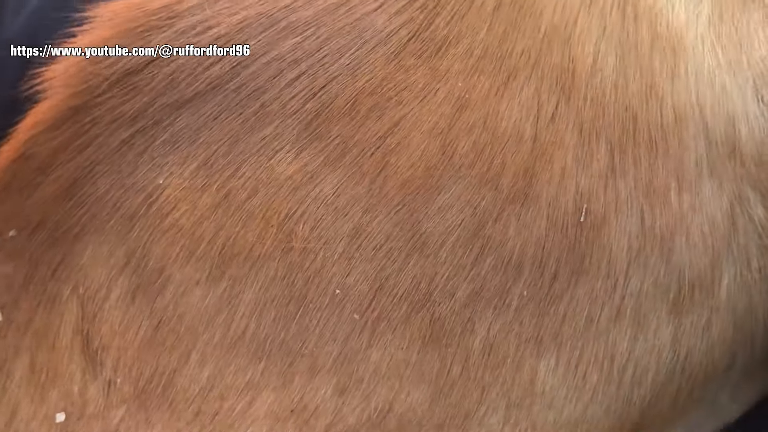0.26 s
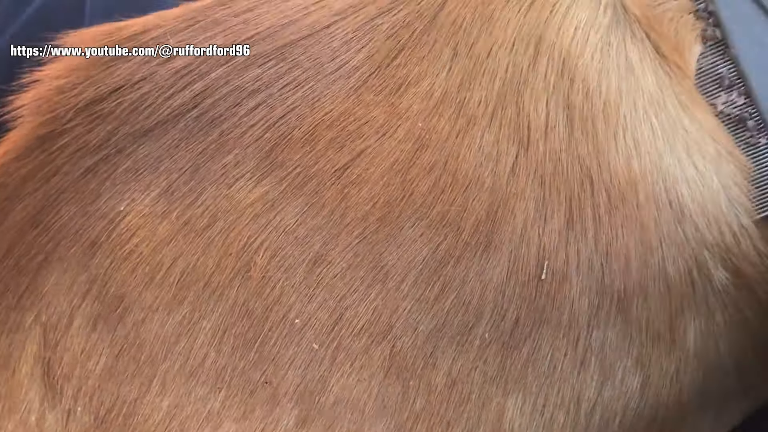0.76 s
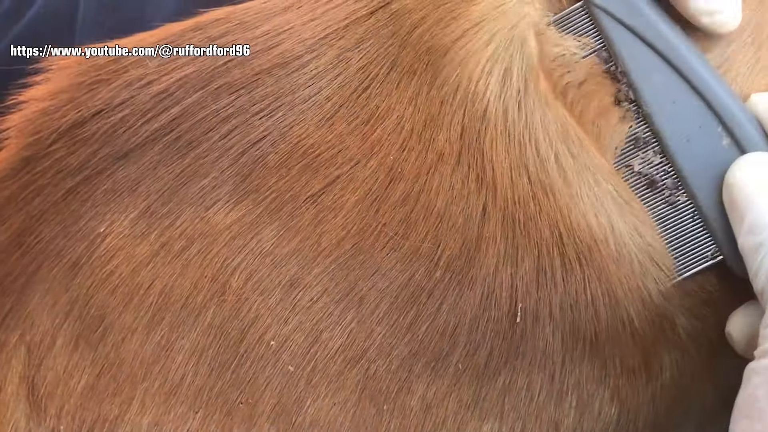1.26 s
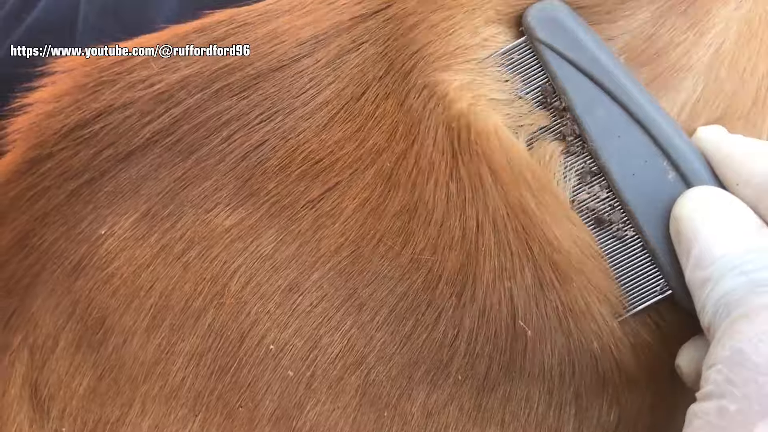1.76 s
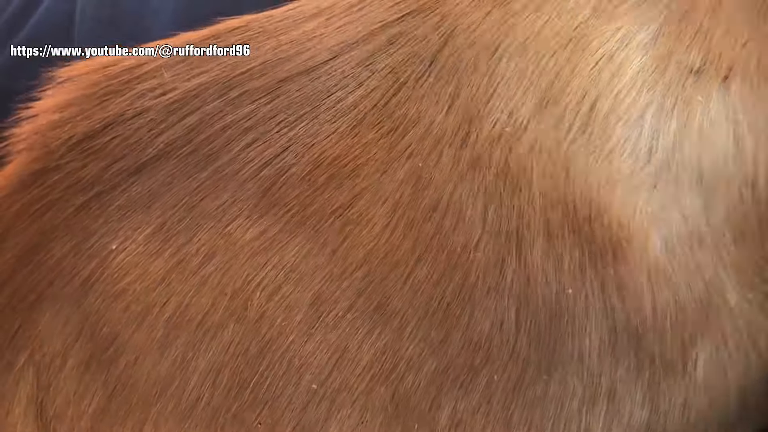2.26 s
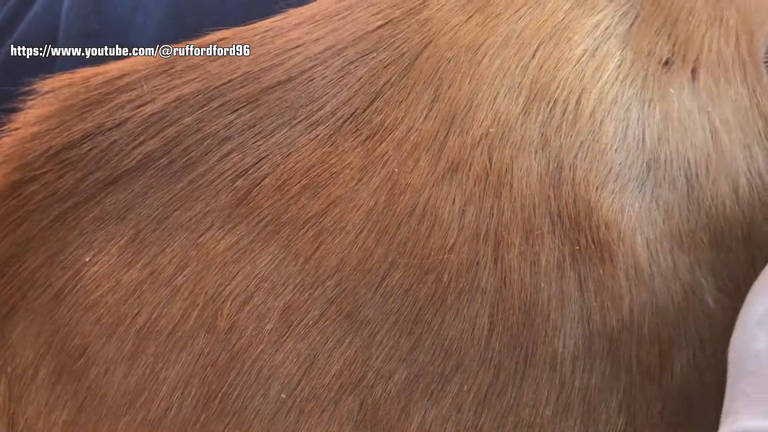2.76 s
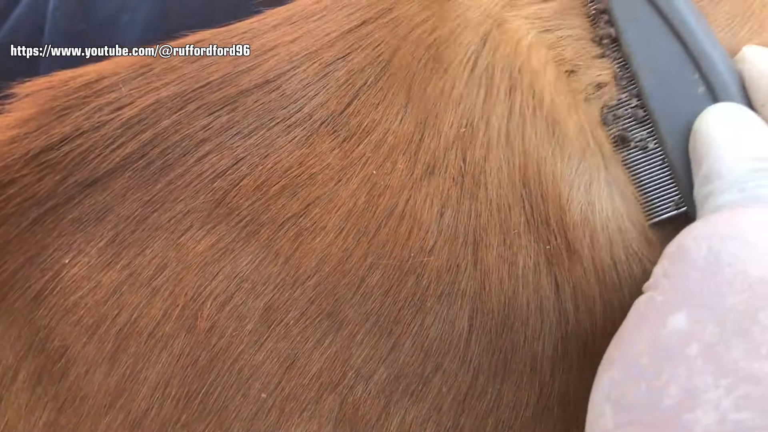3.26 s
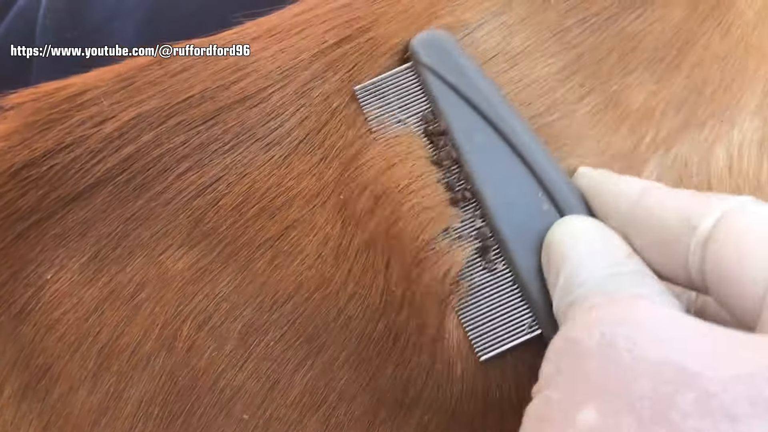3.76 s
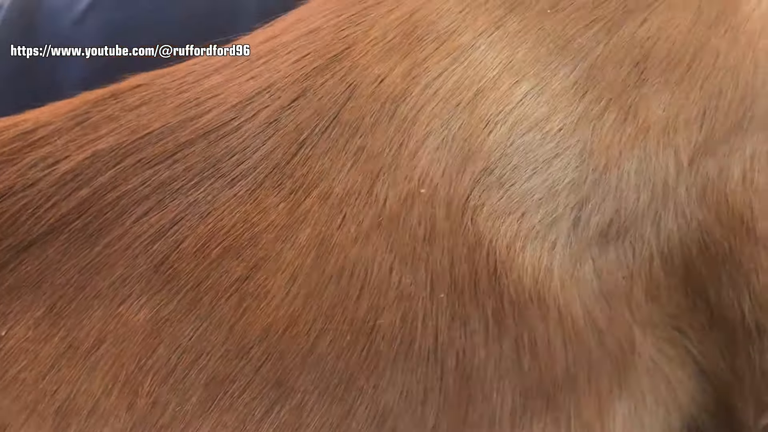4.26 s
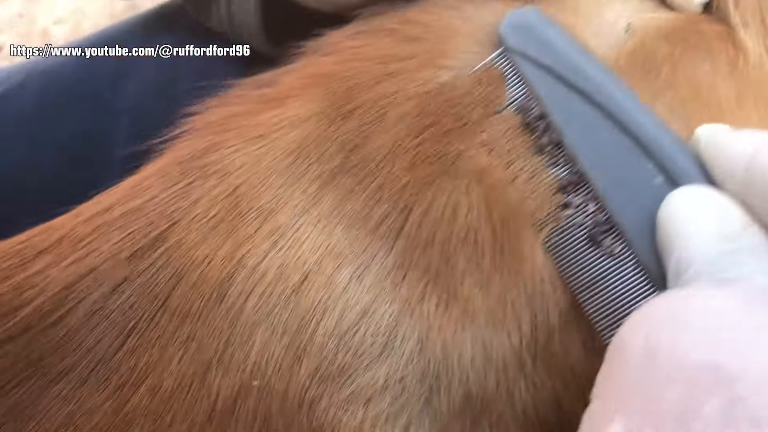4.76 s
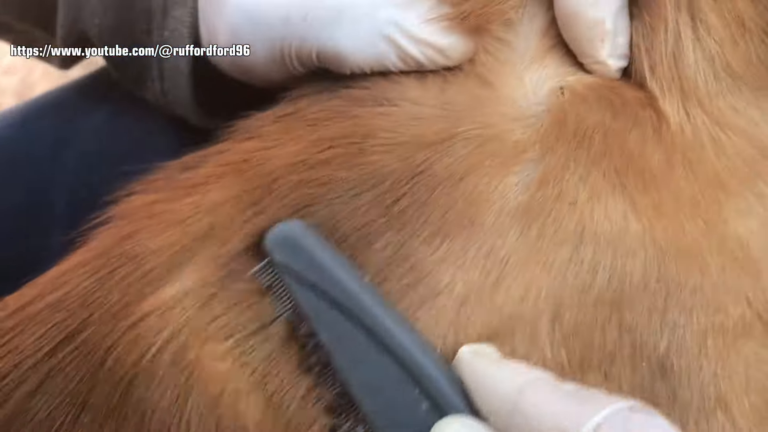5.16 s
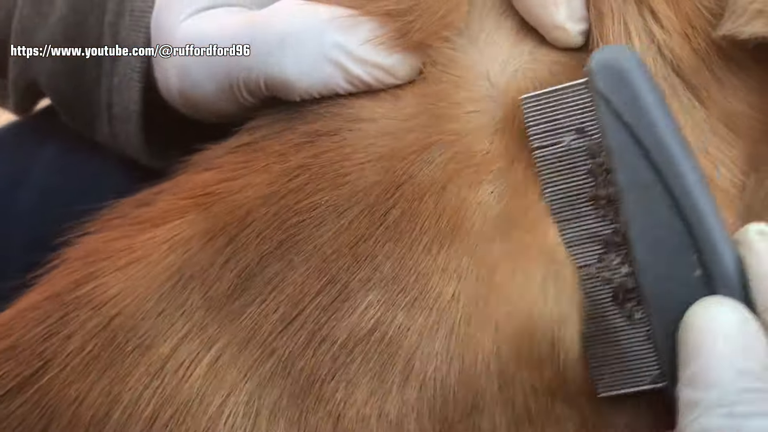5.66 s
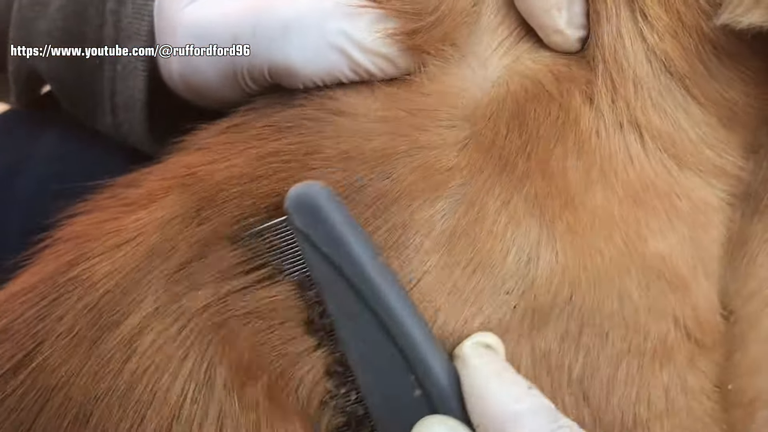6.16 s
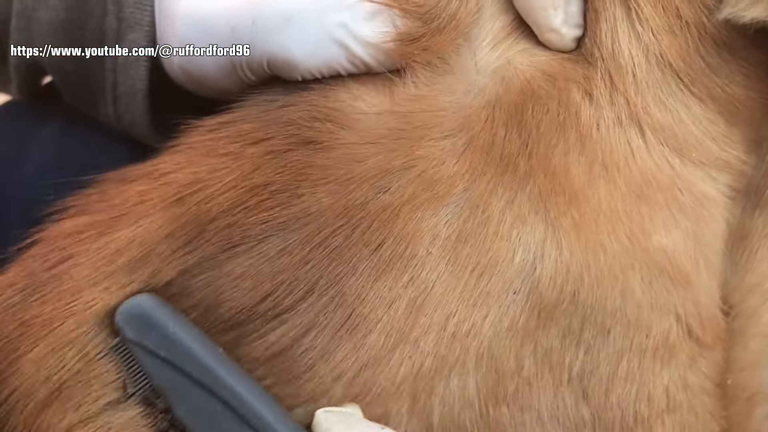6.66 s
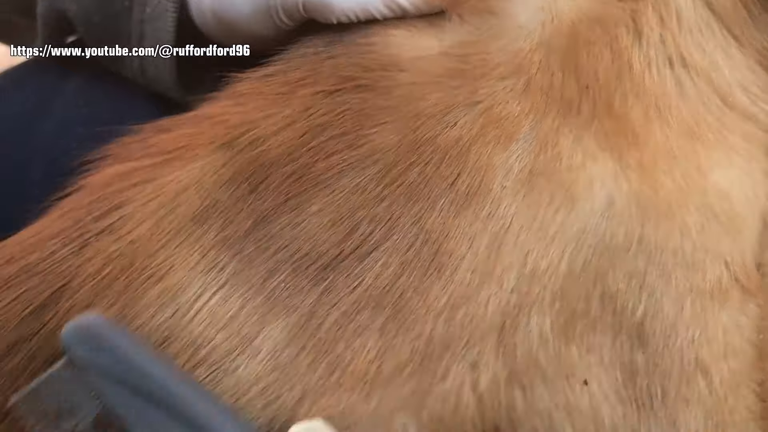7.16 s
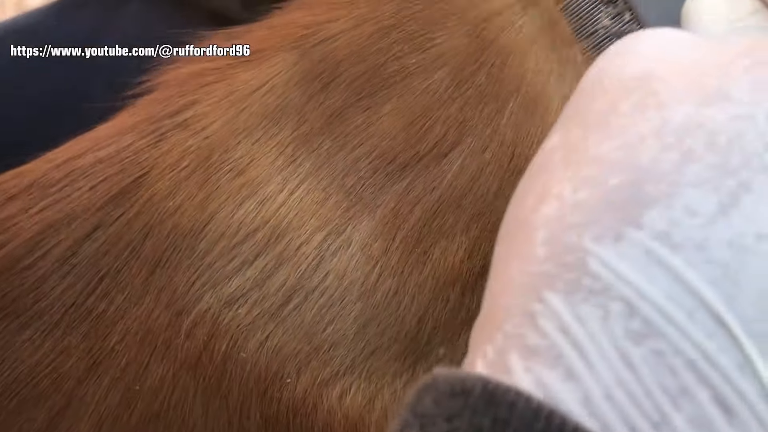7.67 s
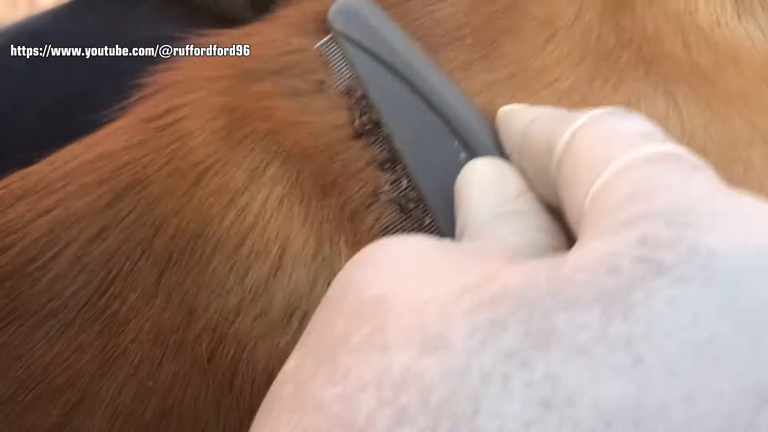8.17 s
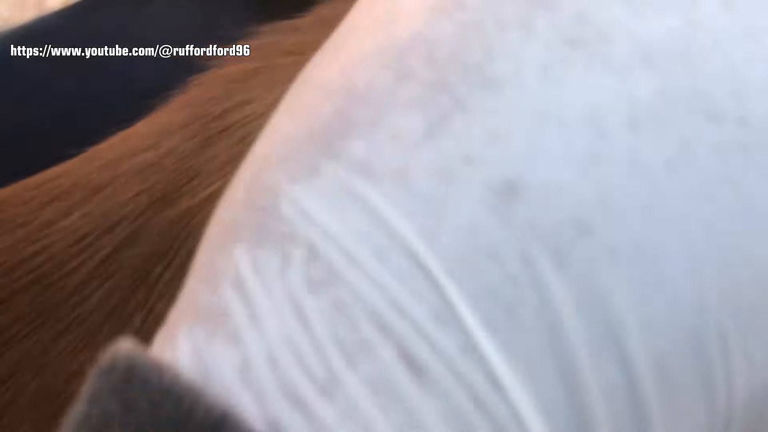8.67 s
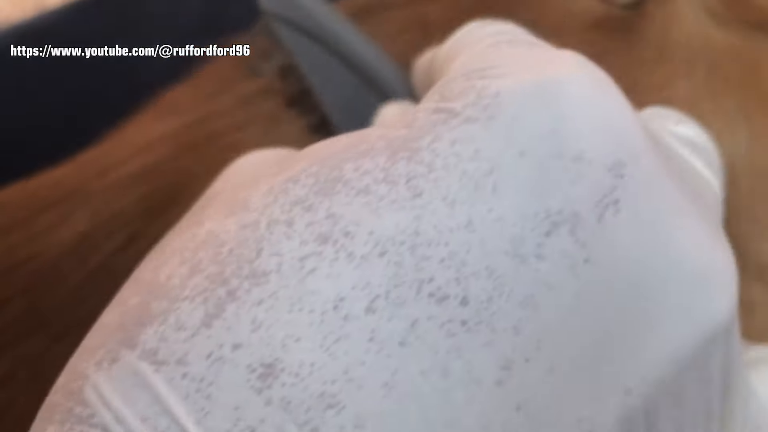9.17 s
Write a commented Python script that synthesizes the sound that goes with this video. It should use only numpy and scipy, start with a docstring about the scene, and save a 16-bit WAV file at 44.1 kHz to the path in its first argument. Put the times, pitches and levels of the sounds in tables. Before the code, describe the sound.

Rumbling wind thumps against the microphone from the start, then eases in the middle and returns toward the end. Quiet hair hiss and short scraping rubs come from a fine comb very near, clustering densely just before and around eight seconds. Quick, falling sparrow chirps run throughout over a distant flock, with soft hoarse hen clucks in the open yard.

```python
"""A fine metal comb is drawn through a dog's coat in a yard: hiss-like noise stands for the hairs,
decaying noise through resonances for the scuffs of glove and comb, tiny noise bursts for snapping teeth.
Gusts buffet the bare microphone as slow noise and swinging pulses; sparrows near and far are gliding
whistles, a hen's clucks are hoarse harmonics. All levels precede the saturation in record()."""
import sys
import numpy as np
from scipy import signal
from scipy.fft import rfft, irfft
from scipy.io import wavfile
from scipy.ndimage import uniform_filter1d

SR = 44100
rng = np.random.default_rng(int(sys.argv[2]) if len(sys.argv) > 2 else 0)


def wrap_up_sound(samples):
    """Save the sound to the file named by the first command line argument, as 16-bit audio."""
    columns = np.atleast_2d(samples).T
    # keep every value between -1 and 1, then stretch to whole-number steps
    tamed = np.clip(columns, -1, 1)
    steps = np.round(tamed * 32767).astype(np.int16)
    wavfile.write(sys.argv[1], SR, steps)


N = 414981

# Fine hiss of hair in the comb: (time [s], level [dB])
STROKE_LEVELS = [(0.0, -68), (2.4, -61), (2.59, -68), (3.96, -61.5), (4.35, -66), (9.41, -62.5)]
# Colour of that hiss: (frequency [Hz], level [dB])
HISS_COLOUR = [(7000, -16), (10600, -18), (15700, -16.5)]
# Scuffs of glove and comb: (time [s], nominal peak [dB], treble tilt [dB/octave], t60 at 1800 Hz [s])
SCUFF_EVENTS = [(0.255, -36, -30, 0.51), (0.5717, -33, -3, 0.17), (1.514, -35, -11, 0.1),
                (2.726, -43.5, 6, 0.41), (2.916, -38.5, -5.5, 0.45), (2.97, -39.5, 3, 0.094),
                (3.11, -50.5, 7, 0.38), (4.044, -29.5, -2.5, 0.23), (4.1257, -34, -4, 0.13),
                (4.1494, -34, -7.5, 0.38), (5.385, -39.5, 1, 0.65), (7.085, -35, -4, 0.91),
                (7.372, -33.5, -6, 0.58), (7.622, -26, 0.5, 0.3), (7.662, -24.5, -6.5, 0.24),
                (7.758, -29, 2, 0.21), (8.0201, -25, -2, 0.2), (8.095, -32, -8, 0.21),
                (8.162, -30, -1.5, 0.36), (8.1923, -31.5, -3, 0.28), (9.164, -34.5, -5, 0.31)]
# Resonances of comb and handle: (frequency [Hz], width [Hz], level [dB])
SCUFF_RESONANCES = [(670, 61, -7.5), (949, 36, 1), (1413, 45, -1), (1797, 37, -5), (2426, 174, -5)]
# Teeth of the comb snapping free: (time [s], peak [dB])
TOOTH_SNAPS = [(1.176, -22), (1.314, -31.5), (3.165, -24.5), (4.63, -34), (4.664, -34)]
# Underlying wind strength at the microphone: (time [s], level [dB])
WIND_LEVELS = [(0, -19.5), (.18, -29), (1.2, -32), (1.75, -24.5), (2.4, -29.5), (2.95, -27), (3.09, -39),
               (3.96, -43), (4.27, -27.5), (4.4, -45), (4.55, -24.5), (4.85, -38.5), (4.97, -24),
               (5.48, -41), (6.4, -35.5), (7.0, -38), (7.58, -31), (7.75, -22.5), (8.6, -30.5), (8.88, -23),
               (9.09, -36), (9.41, -26)]
# Colours of the low rumble and of the higher flapping: (frequency [Hz], level [dB])
RUMBLE_COLOUR = [(20, -48), (50, 3), (120, -2), (250, -16.5), (500, -44.5)]
FLAP_COLOUR = [(60, -12.5), (200, 5), (400, -8), (700, -21), (1100, -37.5), (2000, -107)]
# Sudden buffets of wind: (time [s], nominal level [dB])
BUFFET_EVENTS = [(0.127, -15), (0.345, -25), (0.481, -21), (0.605, -26), (0.627, -23.5), (0.794, -18.5),
                 (0.853, -33), (0.937, -25), (1.165, -29), (1.428, -17.5), (1.54, -19), (1.565, -18),
                 (1.599, -25), (1.636, -16.5), (1.703, -11.5), (1.788, -22.5), (1.847, -24), (1.934, -14),
                 (1.99, -15), (2.039, -18.5), (2.168, -22), (2.188, -17), (2.512, -10), (2.608, -20),
                 (2.664, -17.5), (2.786, -25), (2.939, -21), (4.522, -27), (4.936, -17), (4.969, -23),
                 (5.124, -30), (5.166, -23.5), (6.738, -25), (7.683, -16.5), (7.847, -15.5), (7.953, -19.5),
                 (8.114, -19.5), (8.283, -20.5), (8.32, -23), (8.344, -20), (8.537, -13), (8.552, -14),
                 (8.567, -19.5), (8.859, -24), (9.29, -15.5)]
# Chirp shapes around their steepest drop: (time from the drop [s], pitch [Hz], relative level [dB])
STEP_SHAPE = [(-.068, 5394, -19), (-.052, 5650, -13.5), (-.03, 4855, -7), (-.009, 4420, 6), (0, 3640, -3.5),
              (.012, 3520, 3.5), (.026, 3420, 0), (.038, 3125, -5), (.051, 2720, -17)]
DIVE_SHAPE = [(-.125, 5150, -16), (-.09, 5300, -23), (-.045, 4630, -13.5), (-.015, 4020, -13),
              (0, 3120, -6.5), (.012, 2980, -2.5), (.027, 2690, -12.5), (.043, 2640, -20)]
SLIDE_SHAPE = [(-.105, 4020, -6.5), (-.07, 3974, -3.5), (-.045, 3696, 4), (-.02, 3603, 2.5), (0, 3400, 3.5),
               (.018, 2660, -9)]
ARCH_SHAPE = [(-0.065, 3960, 0), (-0.045, 4240, 0), (-0.012, 3890, 3), (0.0, 3415, 4), (0.035, 3280, -2),
              (0.052, 3014, -2)]
# First sparrow: (time of the drop [s], level [dB], lead-in stretch [factor], pitch [factor], octave [dB])
STEP_CALLS = [(0.235, -50.5, 1.04, 0.95, -1), (0.523, -45, 0.61, 0.98, 1), (0.786, -48, 0.99, 1.01, -3),
              (1.073, -48.5, 0.82, 1.034, 5), (1.409, -47, 1.02, 1.01, -1.5), (1.736, -49.5, 0.78, 0.98, 0),
              (2.061, -49.5, 1.23, 1.04, -8), (2.43, -47.5, 1.17, 1.015, -4),
              (2.862, -48.5, 1.11, 0.98, 2.5), (3.282, -46.5, 1.08, 0.98, 2),
              (3.972, -45.5, 0.85, 0.98, 1.5), (4.371, -46.5, 0.94, 0.98, 3), (4.684, -45, 1.07, 0.98, -1),
              (5.012, -38.5, 1.16, 1.07, -24), (5.347, -43.5, 0.89, 1.034, -3.5),
              (5.716, -47, 0.95, 1.01, 6), (6.012, -47.5, 0.827, 1.02, 9.5), (6.697, -46.5, 0.64, 0.99, 0),
              (7.055, -45.5, 0.93, 0.98, 5.5), (7.407, -46, 1.06, 1.03, 2.5),
              (7.77, -49.5, 1.06, 0.97, 6.5), (8.066, -50, 1.1, 0.97, 7), (8.724, -51.5, 0.71, 0.99, 9),
              (9.158, -53, 0.86, 1.02, 9.5)]
# Second sparrow: (time of the drop [s], level [dB], lead-in stretch [factor])
DIVE_CALLS = [(0.185, -38.5, 0.69), (2.327, -40, 0.81), (2.727, -38.5, 0.74), (4.127, -40, 0.95),
              (4.915, -39, 0.91), (5.607, -38, 0.81), (7.934, -41.5, 0.97), (8.405, -38, 0.79),
              (9.264, -42, 0.74)]
# Third sparrow: (time of the drop [s], level [dB])
SLIDE_CALLS = [(5.633, -47), (6.19, -49.5), (6.538, -45.5), (8.09, -48.5), (8.718, -49), (9.144, -48)]
# Fourth sparrow: (time of the drop [s], level [dB], lead-in stretch [factor])
ARCH_CALLS = [(6.76, -44.5, 0.8), (7.171, -46, 0.93), (7.486, -48, 1), (9.407, -52, 0.81)]
# Plain falling whistles: (time [s], level [dB], start pitch [Hz], end pitch [Hz], length [s])
GLIDE_CALLS = [(1.134, -56, 5200, 3410, 0.095), (1.392, -53, 5430, 3720, 0.079),
               (1.648, -60, 4870, 3200, 0.057), (3.029, -63, 5550, 3680, 0.15),
               (3.52, -62, 4440, 3740, 0.051), (3.876, -58, 3860, 3100, 0.093),
               (4.463, -62, 4650, 2970, 0.065), (4.618, -47, 3785, 3500, .118),
               (4.989, -47.5, 3770, 3500, .105), (6.948, -56, 4220, 3850, 0.049),
               (6.262, -66, 4480, 4150, 0.075), (8.966, -56.5, 4940, 3960, 0.087),
               (9.312, -54, 4820, 4000, 0.065)]
# Clucks of the hen: (time [s], nominal level [dB])
CLUCK_EVENTS = [(2.284, -40), (3.6, -42), (3.642, -44), (4.261, -41), (4.636, -40), (5.3, -41.5),
                (5.875, -45), (5.998, -40), (6.115, -45), (6.375, -41.5), (6.495, -42.5), (6.674, -44)]
# Colour of the steady yard noise: (frequency [Hz], level [dB])
YARD_COLOUR = [(180, -24), (300, 2.5), (477, -12.5), (664, -4.5), (758, -10), (1020, -9.5), (2190, -21),
               (3840, -23.5), (10400, -32.5), (14900, -23), (15700, -20)]


def combing():
    """Stick-slip in bulk: hairs slip past the teeth in tiny snaps so dense that they merge into noise."""
    return amp(along(STROKE_LEVELS) + 2 * lumps(1.1, 40)) * noise(HISS_COLOUR)


def scuffs():
    """Friction exciting resonance: scratches set comb and handle ringing, and the treble dies first."""
    ring_db, ring_spread_db = 6, 2  # level of the rings, and how it differs per contact
    linger = 1.4  # the drive of the rings outlasts the scratch by this factor
    swell_s = 0.06  # rise of a rub whose t60 is 1 s; short scuffs start abruptly
    grit_db = 3
    out = np.zeros(N)
    hz = np.fft.rfftfreq(256, 1 / SR)[:, None] + 1
    t = np.arange(240) * 64 / SR
    edges_db = -25 * np.log2(np.maximum(700 / hz, 1)) - 17.5 * np.log2(np.maximum(hz / 6000, 1))
    scratch_fade_db = -60 * t * (hz / 1800) ** 0.34  # for a t60 of 1 s
    for s, db, tilt_db, t60 in SCUFF_EVENTS:
        real, imag, patches = rng.standard_normal((3, len(hz), len(t)))
        # the contact keeps shifting
        patches = evened(uniform_filter1d(uniform_filter1d(patches, 4, 0), 20, 1))
        # hairs catch and let go
        snags = evened(uniform_filter1d(rng.standard_normal(len(t)), 4))
        colour_db = tilt_db * np.log2(np.maximum(hz, 900) / 1800) + 2.7 * patches + 1.3 * snags
        colour = (real + 1j * imag) * amp(colour_db)
        scratch = from_spectra(colour * amp(edges_db + scratch_fade_db / t60))
        drive = from_spectra(colour * amp(-60 * t / (linger * t60)))

        u = np.arange(len(drive)) / SR
        rise = np.minimum(u / (swell_s * t60 ** 2 + 0.001), 1)
        rise *= np.minimum((u[-1] - u) / 0.15, 1)  # closes the end
        grit = amp(grit_db * evened(uniform_filter1d(rng.standard_normal(len(u)), 40)))  # hairs and teeth
        rings = np.zeros(len(u))
        for mode_hz, width, mode_db in SCUFF_RESONANCES:
            grip, shift = rng.standard_normal(2)
            gain = amp(ring_db + mode_db + ring_spread_db * grip)
            rings += gain * ring(drive * rise * grit, mode_hz * (1 + 0.025 * shift), width)
        # a light touch sounds mostly through the rings
        burst = amp(min(db + 30.5, 0)) * scratch * rise * grit + rings
        loudest_rms = np.sqrt(uniform_filter1d(burst ** 2, 1000).max())
        add(out, s, amp(db) * burst / (3 * loudest_rms))  # nominal peak: three times this rms
    return out


def tooth_snaps():
    """Impulsive release: a tooth springs free in a very short, bright burst of noise."""
    out = np.zeros(N)
    t = np.arange(100) / SR
    for s, db in TOOTH_SNAPS:
        snap = amp(-60 * t / 0.0051) * rng.standard_normal(len(t))
        add(out, s, amp(db) * snap / abs(snap).max())
    return out


def wind():
    """Turbulent pressure: eddies press on the microphone in lumps; stronger ones reach higher in pitch."""
    lull_db, eddy_low_db, eddy_high_db = 4, 0.1, 5.5
    flap_db, flap_at_db, flap_slope = -46.5, -27.5, 1.94  # flapping grows faster than the rumble
    front_db, front_s = 3, 0.0036  # front level relative to the swing
    swing_s = 0.0085
    wake_db, wake_s = -13.5, 0.018  # wake level relative to the swing
    slap_hz, slap_s = 438, 0.00614  # each swing starts this much higher and sinks with this time constant
    lulls, eddies = lumps(3, 20), lumps(10, 70)
    pressure = amp(along(WIND_LEVELS))
    fronts, swings = np.zeros((2, N))
    t = np.arange(0, 0.25, 1 / SR)
    for s, db in BUFFET_EVENTS:
        pitch, phase = rng.random(2)
        add(fronts, s, amp(db + front_db) * pulse(t, front_s) ** 2)  # the sharp front of the eddy
        cycles = (55 + 70 * pitch) * t - slap_hz * slap_s * np.exp(-t / slap_s) + phase
        envelope = pulse(t, swing_s) * (1 - np.exp(-t / 0.0023))
        add(swings, s, amp(db) * envelope * np.sin(2 * np.pi * cycles))
        add(pressure, s, amp(db + wake_db) * pulse(t, wake_s))  # the air stays stirred behind it
    strength_db = 20 * np.log10(pressure) + lull_db * lulls
    rumble = amp(strength_db + eddy_low_db * eddies)
    flapping_db = flap_db + flap_slope * (strength_db - flap_at_db) + eddy_high_db * eddies
    flapping = amp(np.minimum(flapping_db, -21)) + fronts
    return rumble * noise(RUMBLE_COLOUR) + flapping * noise(FLAP_COLOUR) + swings


def sparrows():
    """Direct and reflected sound: four near birds, a few glides and a random far flock, with echoes."""
    far_count, far_db, far_t60_s = 160, -66.5, 0.23
    birds, flock = np.zeros((2, N))
    for shape, calls, octave_db, bow_hz in (
            (STEP_SHAPE, STEP_CALLS, -9, 928), (DIVE_SHAPE, DIVE_CALLS, -24, 0),
            (SLIDE_SHAPE, SLIDE_CALLS, -18, 0), (ARCH_SHAPE, ARCH_CALLS, -18, 0)):
        for s, *call in calls:
            lead, sound = chirp(shape, octave_db, *call, bow_hz=bow_hz)
            add(birds, s + lead, sound)
    for s, db, *shape in GLIDE_CALLS:
        add(birds, s, chirp(glide(*shape), -25, db)[1])
    for at, size, top, fall in rng.random((far_count, 4)):
        hz = 3900 + 1400 * top
        shape = glide(hz, hz * (0.9 - 0.2 * fall), 0.03 + 0.04 * fall)
        add(flock, at * N / SR, chirp(shape, -40, far_db + 8 * (size - 0.5))[1])

    t = np.arange(SR // 4) / SR
    haze = rng.standard_normal(len(t)) * amp(-60 * t / far_t60_s)  # ring of the distance
    birds += flock + reverberate(flock, haze)
    echoes = rng.standard_normal(len(t)) * amp(-60 * t / 0.14) * (t > 0.004)  # walls and trees of the yard
    return birds + amp(-7.5) * reverberate(birds, echoes)


def chirp(shape, octave_db, level_db, early=1, pitch=1, brighter_db=0, bow_hz=0):
    """Frequency modulation: an unsteady whistle whose faint octave swells once the pitch has dropped."""
    tail_per_pitch = 2.5  # a higher chirp holds its tail longer: share of length per share of pitch
    waver_share, flutter_db = 0.0061, 3
    s, hz, db = np.transpose(shape)
    s = s * np.where(s < 0, early, 1 + tail_per_pitch * (pitch - 1))
    t = np.arange(s[0], s[-1], 1 / SR)
    waver, flutter = (evened(uniform_filter1d(uniform_filter1d(v, 200), 200))
                      for v in rng.standard_normal((2, len(t))))
    # a hurried lead-in bulges upward: bow_hz is Hz per share of lost length
    bulge = bow_hz * (1.1 - early) * np.sin(np.pi * np.clip((t + 0.0043) / s[0], 0, 1) ** 0.71)
    bowed_hz = np.minimum(np.interp(t, s, hz) + bulge, hz.max())
    hz = uniform_filter1d(bowed_hz * pitch, 100) * (1 + waver_share * waver)
    turn = 2 * np.pi * np.cumsum(hz) / SR
    shape_db = np.interp(t, s, db)
    octave = amp(octave_db + brighter_db) * np.clip((3760 * pitch - hz) / 100, 0.12, 1)
    octave *= amp(-0.75 * shape_db)  # fades less than the whistle
    level = amp(level_db + shape_db + flutter_db * flutter)
    level *= np.minimum((t - t[0]) / 0.015, 1) * np.minimum((t[-1] - t) / 0.006, 1)
    return s[0], np.sqrt(2) * level * (np.sin(turn) + octave * np.sin(2 * turn))


def glide(from_hz, to_hz, length):
    """Pitch contour: the chirp shape of a plain falling whistle that swells and fades."""
    return [(0, from_hz, -8), (length / 2, 0.55 * from_hz + 0.42 * to_hz, 0), (length, to_hz, -5)]


def hen():
    """Harmonic voice: short hoarse clucks of three partials, the second strongest, with sagging pitch."""
    out = np.zeros(N)
    t = np.arange(0, 0.06, 1 / SR)
    for s, db in CLUCK_EVENTS:
        pitch = rng.uniform(0.96, 1.03)
        hoarse = evened(uniform_filter1d(rng.standard_normal(len(t)), 120))
        turn = 2 * np.pi * 345 * pitch * (t - 0.56 * t ** 2)
        voice = 0.81 * np.sin(turn) + np.sin(2 * turn) + amp(-11) * np.sin(3 * turn)
        add(out, s, amp(db) * voice * (1 + 0.67 * hoarse) * pulse(t, 0.0079))
    return out


def yard():
    """Stationary noise: the background of the yard keeps one colour and level."""
    return amp(-51.5) * noise(YARD_COLOUR)


def amp(db):
    """Decibel law: the amplitude factor of a level in dB."""
    return 10 ** (np.asarray(db) / 20)


def evened(x):
    """Normalization: scales a signal to rms 1."""
    return x / np.sqrt(np.mean(x ** 2) + 1e-20)


def add(mix, s, sound):
    """Superposition: adds a sound to the mix from time s on."""
    part = mix[round(s * SR):][:len(sound)]
    part += sound[:len(part)]


def along(rows):
    """Linear interpolation: a (time, value) curve at every sample."""
    return np.interp(np.arange(N) / SR, *np.transpose(rows))


def noise(spectrum):
    """Spectral shaping: noise of rms 1, silent over an octave below the first or above the last row."""
    f, db = np.transpose(spectrum)
    hz = np.fft.rfftfreq(N, 1 / SR) + 1
    gain = amp(np.interp(np.log(hz), np.log(f), db)) * (hz > f[0] / 2) * (hz <= f[-1])
    return evened(irfft(rfft(rng.standard_normal(N)) * gain, N))


def lumps(lo_hz, hi_hz):
    """Random modulation: slow noise of rms 1, mostly between two rates."""
    return noise([(lo_hz / 2, -40), (lo_hz, 0), (hi_hz, -6), (hi_hz * 2, -40)])


def pulse(t, peak_s):
    """Critically damped response: rises to 1 at peak_s and dies away."""
    return t / peak_s * np.exp(1 - t / peak_s)


def ring(x, hz, width):
    """Resonance: a band of the given width in Hz with gain 1 at its peak."""
    return signal.lfilter(*signal.iirpeak(hz, hz / width, SR), x)


def from_spectra(spectra):
    """Overlap-add synthesis: turns successive short spectra into sound."""
    return signal.istft(spectra, nperseg=256, noverlap=192)[1][128:]


def reverberate(x, response):
    """Convolution: reflects a sound by an impulse response scaled to unit energy."""
    return signal.fftconvolve(x, response / np.linalg.norm(response))[:N]


def scene():
    """Superposition of all sources at the one microphone."""
    return (combing() + scuffs() + tooth_snaps() + wind() + sparrows() + hen() + yard())[None]


def record(dry):
    """Saturation and band limit: the strongest gusts squeeze the microphone's stage, then a low-pass."""
    squeezed = 0.5 * np.tanh(dry / 0.7)
    low_pass = signal.firwin(511, 15720, window=("kaiser", 9), fs=SR)  # cutoff in Hz
    return signal.oaconvolve(squeezed, low_pass[None], "same")


dry = scene()
out = record(dry)
wrap_up_sound(out)
```